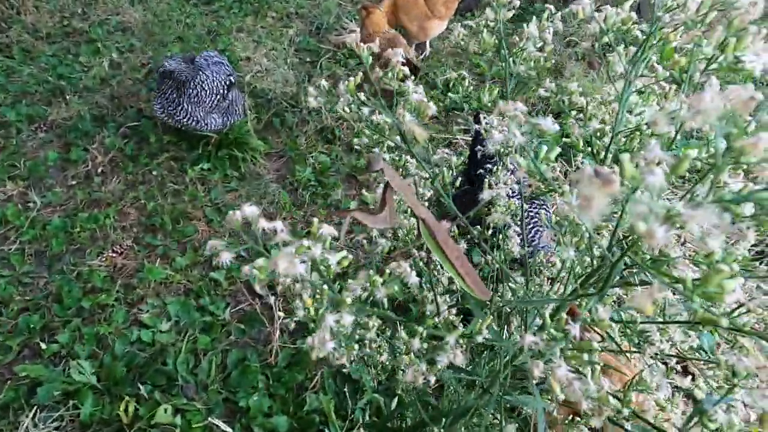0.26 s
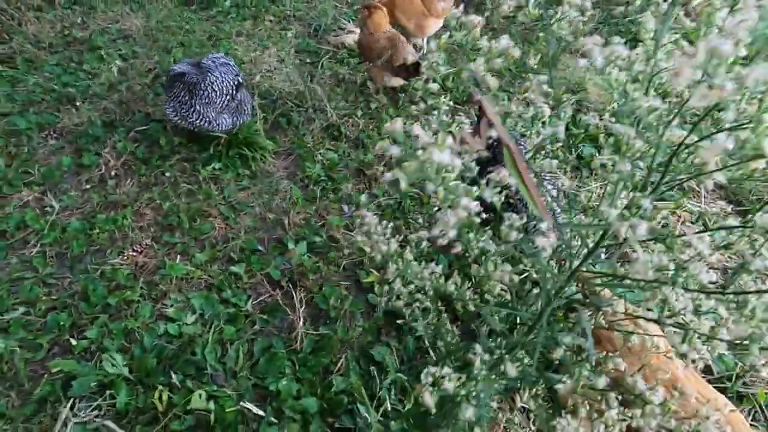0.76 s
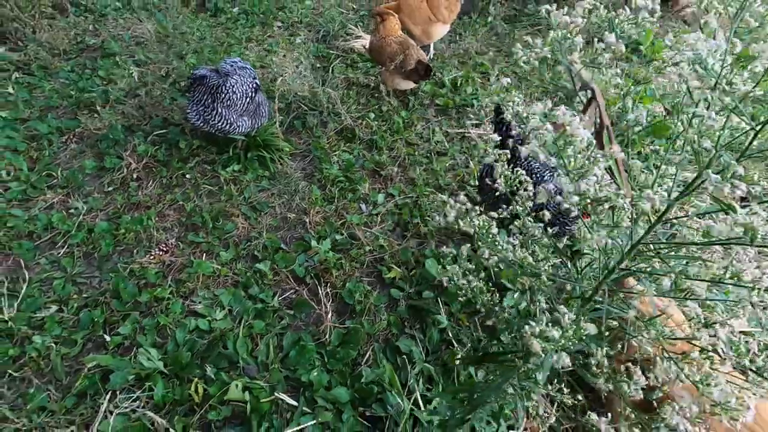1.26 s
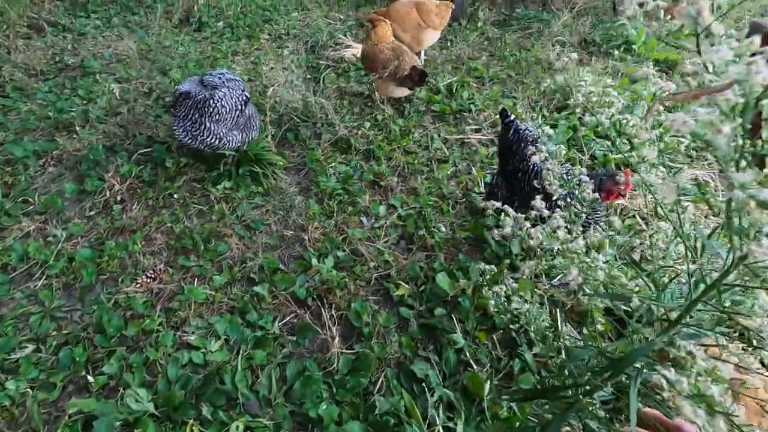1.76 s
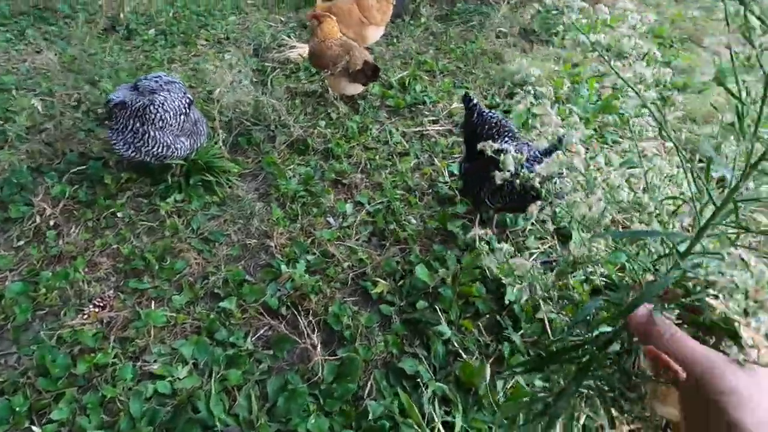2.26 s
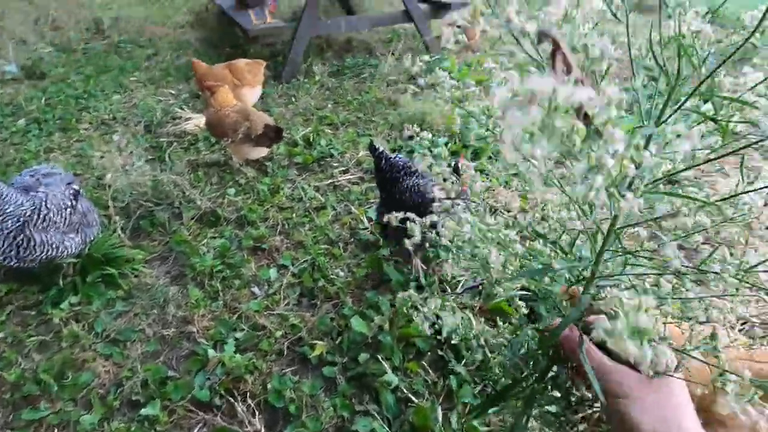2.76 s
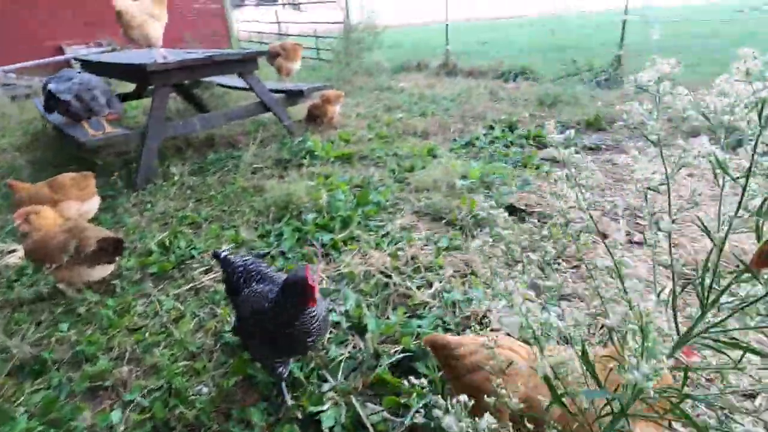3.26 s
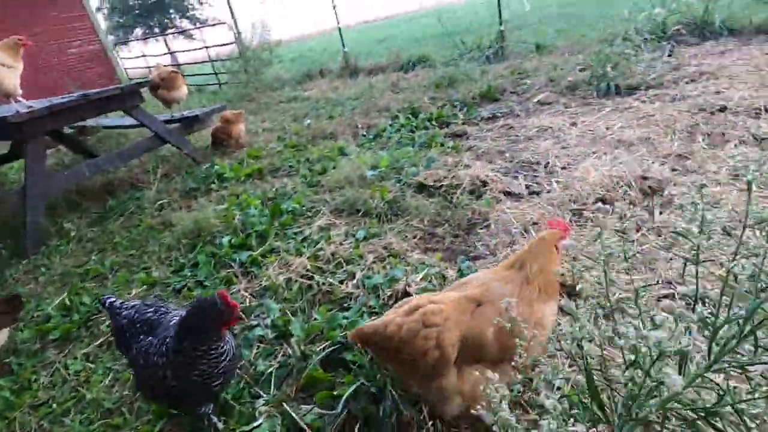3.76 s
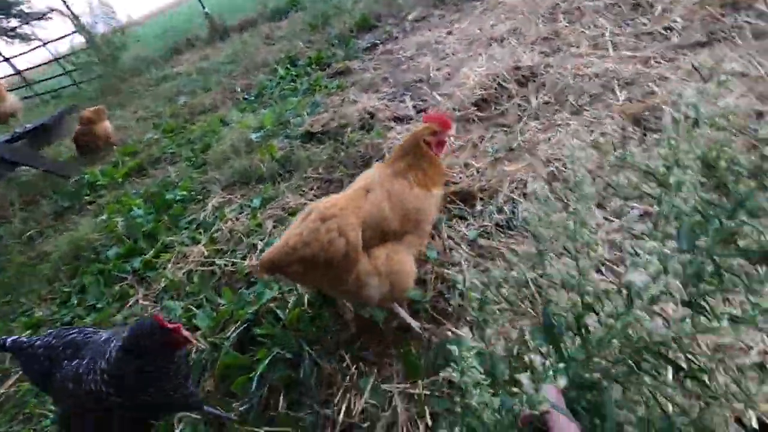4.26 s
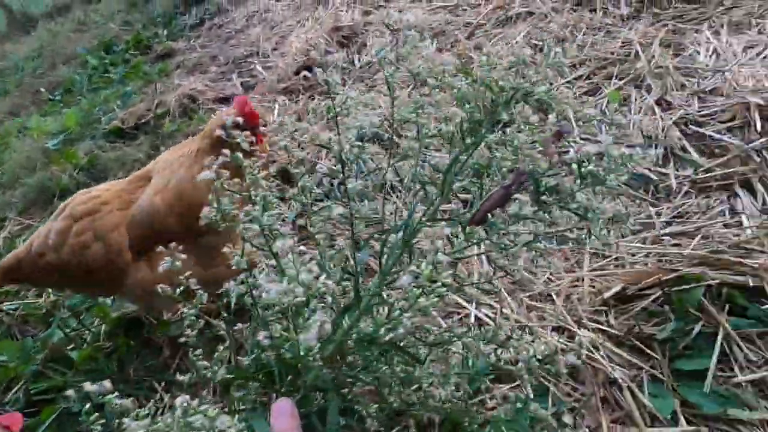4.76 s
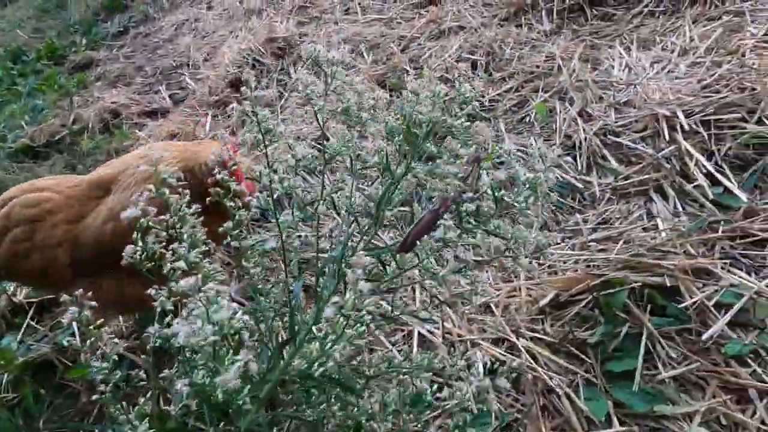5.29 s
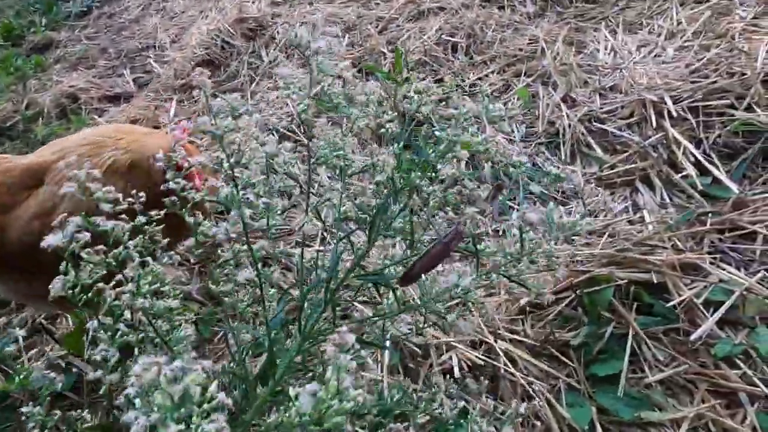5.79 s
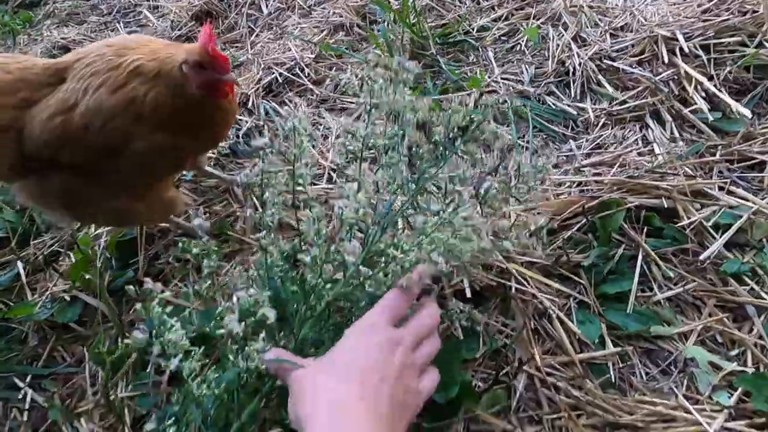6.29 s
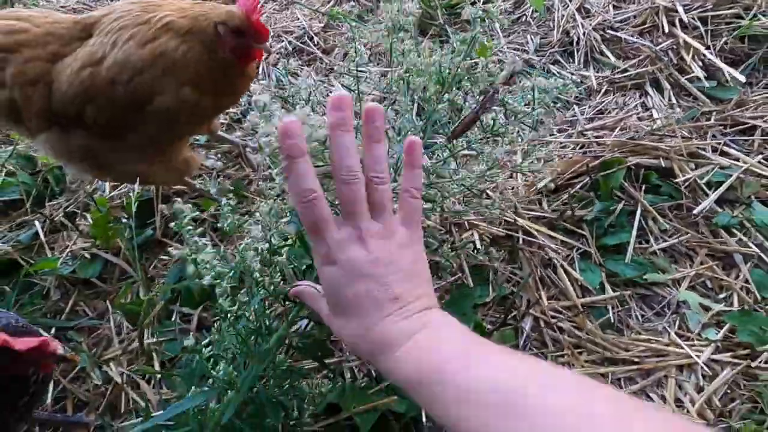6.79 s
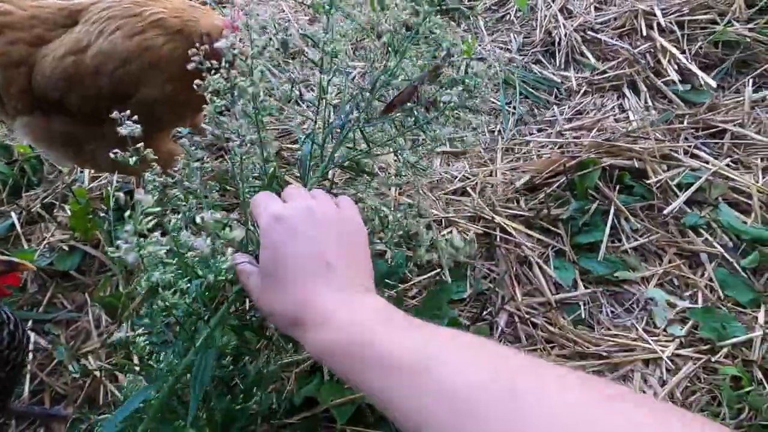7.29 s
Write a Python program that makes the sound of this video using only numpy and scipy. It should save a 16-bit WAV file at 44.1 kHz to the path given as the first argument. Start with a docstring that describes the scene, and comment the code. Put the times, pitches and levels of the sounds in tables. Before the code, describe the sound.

A nearby hen clucks and draws out hoarse, whining moans while dry weeds rustle and snap close by, over faint crickets in a quiet yard.

```python
"""A hen a step away clucks and draws out long calls: harmonic stacks in which a thin whine breaks into a
nasal moan, and alternating strong and weak cycles make it hoarse. Tall weeds close to the microphone swish
and scrape as dense tiny contacts, and stalks snap as decaying noise bursts. Soft bumps are damped sines,
puffs of air low noise. Crickets chirp in short falling tones over coloured yard noise and the unsteady
low sine of a distant engine."""
import sys
import numpy as np
from scipy import signal
from scipy.fft import rfft, irfft, next_fast_len
from scipy.io import wavfile

SR = 44100
rng = np.random.default_rng(int(sys.argv[2]) if len(sys.argv) > 2 else 0)


def bounce(signal):
    """Save signal as a 16-bit WAV file at the path given by the first command-line argument."""
    frames = np.transpose(np.atleast_2d(signal))
    limited = np.clip(frames, -1, 1)
    pcm = np.round(limited * 32767).astype(np.int16)
    wavfile.write(sys.argv[1], SR, pcm)


N = 332514
T = np.arange(N) / SR


def undb(db):
    """Level law: decibels to amplitude gain."""
    return 10 ** (np.asarray(db) / 20)


def unit(x):
    """Normalization: scale to rms 1."""
    return x / np.sqrt(np.mean(x ** 2))


def curves(rows, t=T):
    """Linear interpolation: the columns of a table, joined by straight lines in time."""
    s, *columns = np.transpose(rows)
    return [np.interp(t, s, c) for c in columns]


def colour_db(points, hz):
    """Spectral envelope: read a spectrum in dB on a log-frequency axis."""
    f, db = np.transpose(points)
    return np.interp(np.log(hz + 1), np.log(f), db)


def tint(x, points):
    """Linear filtering: multiply the spectrum of x by an envelope."""
    size = next_fast_len(N)
    gain = undb(colour_db(points, np.fft.rfftfreq(size, 1 / SR)))
    return irfft(rfft(x, size) * gain, size)[..., :N]


def band(x, lo_hz, hi_hz):
    """Resonance: a gentle first-order band-pass."""
    edges = [lo_hz, min(hi_hz, SR / 2 - 1000)]
    return signal.sosfilt(signal.butter(1, edges, "band", fs=SR, output="sos"), x)


def walk(rate, t=T):
    """Random fluctuation: independent normal levels, rate a second, joined by lines."""
    return np.interp(t * rate, np.arange(4096), rng.standard_normal(4096))


def spread(three, width):
    """Interaural coherence: a shared signal plus one of its own for each ear."""
    width = np.clip(width, 0, 1)
    return np.sqrt(1 - width) * three[0] + np.sqrt(width) * three[1:]


def pan(db):
    """Level difference between the ears: left and right gains for left minus right in dB."""
    return undb(np.array([[1], [-1]]) * db / 2)


def add(out, s, x):
    """Superposition: mix x into out from s seconds."""
    i = max(int(s * SR), 0)
    out[..., i:i + x.shape[-1]] += x[..., :max(N - i, 0)]


# Spectrum of the yard noise. Each row: frequency in Hz, relative level in dB.
YARD_COLOUR = [(25, -2), (53, -1), (118, -3.5), (224, -5), (320, -15.5), (475, -19.5), (800, -20.5),
               (1050, -20), (1500, -17), (2600, -34), (3500, -19.5), (4100, -25.5), (4750, -16.5),
               (5700, -31), (8000, -35.5), (12000, -54), (15000, -63)]
# Distant engine hum. Each row: time in seconds, relative level in dB.
HUM_LEVEL = [(0, -51.5), (1.2, -57.5), (1.9, -57), (3.3, -68.5), (4.7, -63), (7.54, -65.5)]


def yard(yard_db=-56, hum_hz=108):
    """Ambient noise: far-off rumble and a diffuse haze of insects, with a frequency-wandering engine hum."""
    noise = unit(tint(rng.standard_normal((3, N)), YARD_COLOUR))
    low = signal.sosfilt(signal.butter(1, 1500, fs=SR, output="sos"), noise)
    rumble = spread(low, 0.35) * undb(1.57 * walk(7.6))
    haze = spread(noise - low, 0.9) * undb(0.38 * walk(1.6))
    hum = np.sqrt(2) * np.sin(2 * np.pi * np.cumsum(hum_hz + 4.29 * walk(16)) / SR)
    hum_db = curves(HUM_LEVEL)[0] - 1.0 + 4.05 * walk(15)
    return undb(yard_db) * (rumble + haze) + hum * undb(hum_db)


# Cricket chirps. Each row: start in seconds, peak level in dB before panning, number of wing strokes.
CHIRP_ROWS = [(.17, -55.5, 3), (0.896, -54.5, 3), (1.48, -51.5, 3), (2.12, -54, 3), (2.762, -56, 3),
              (3.354, -56.5, 4), (3.969, -58.5, 3), (4.69, -62, 3), (5.513, -59.5, 3), (6.098, -62, 4),
              (6.91, -60.5, 3), (7.484, -63, 1)]
# A second cricket's trill. Each row: time in seconds, mean peak level in dB before panning.
TRILL_LEVEL = [(2.2, -86), (2.27, -65), (2.37, -74), (2.55, -59.5), (2.7, -63.5), (2.8, -92)]


def crickets(stroke_s=0.036, period_s=.053, start_hz=4720, end_hz=4400, trill_hz=4335):
    """Stridulation: each wing stroke is a short falling tone; a second cricket holds one brief trill."""
    out, t = np.zeros(N), np.arange(0, stroke_s, 1 / SR)
    for s, db, strokes in CHIRP_ROWS:
        for k in range(int(round(strokes))):
            hz = np.linspace(start_hz, end_hz, len(t)) * (1 + 0.015 * walk(400, t))
            stroke = np.hanning(len(t)) * np.sin(2 * np.pi * np.cumsum(hz) / SR)
            add(out, s + k * period_s, undb(db) * stroke)
    trill = np.sin(2 * np.pi * np.cumsum(trill_hz + 20 * walk(150)) / SR)
    trill = trill * undb(curves(TRILL_LEVEL)[0] + 1.5 * walk(60))
    return (out + trill) * pan(3.4)


# Soft bumps and taps near the microphone.
# Each row: start in seconds, relative level in dB, frequency in Hz, 60 dB decay time in seconds.
BUMP_ROWS = [(.336, -46.5, 328, 0.028), (.366, -38.5, 260, 0.033), (0.4, -34, 110, 0.027),
             (.436, -35.5, 285, 0.02), (.494, -31, 76, 0.093), (.497, -37, 235, 0.028),
             (1.282, -35, 935, 0.014), (1.491, -23.5, 1200, 0.012), (4.44, -30, 40, 0.045),
             (7.455, -35.5, 170, 0.019)]
# Spectrum of air on the microphone. Each row: frequency in Hz, relative level in dB.
AIR_SPECTRUM = [(15, -2.5), (28, 2.5), (65, 8), (100, -1.5), (200, -19), (400, -27), (900, -67.5)]
# Puffs of air. Each row: centre in seconds, full width to 1/e in seconds, level in dB.
PUFF_ROWS = [(0.51, 0.08, -42.5), (.8, .9, -53), (1.78, 0.1, -52), (3.06, 0.3, -55), (3.648, 0.37, -51.5),
             (4.464, 0.077, -46)]
DRAUGHT_DB = -62.5  # mean level of the air between the puffs


def handling():
    """Damped oscillation and turbulence: decaying knocks, and low puffs of air over a faint draught."""
    knocks, t = np.zeros(N), T[:SR // 5]
    for s, db, hz, t60 in BUMP_ROWS:
        onset = 1 - np.exp(-t / 0.0011)
        add(knocks, s, -undb(db + 3.0 - 60 * t / t60) * np.sin(2 * np.pi * hz * t) * onset)
    air = spread(unit(tint(rng.standard_normal((3, N)), AIR_SPECTRUM)), 0.47)
    puffs = sum(undb(db) * np.exp(-(2 * (T - s) / length) ** 2) for s, length, db in PUFF_ROWS)
    return knocks + air * np.hypot(puffs, undb(DRAUGHT_DB + 5.0 * walk(9.7)))


# Dry stalks snapping.
# Each row: start in seconds, relative peak level in dB, left minus right in dB, ring frequency in Hz.
SNAP_ROWS = [(.4983, -38.5, 11, 4000), (1.0992, -42, 8, 2320), (1.143, -54, 2, 2600),
             (1.4823, -38, 0, 4520), (1.658, -41, -2, 3300), (1.6732, -37.5, 3, 2870),
             (1.749, -42.5, 8, 2590), (1.7796, -31, 5, 2910), (1.7953, -39, 4, 2540),
             (2.0313, -45, 5, 2510), (2.076, -40, 2, 2570), (2.7088, -38.5, .5, 2940),
             (2.8565, -37, 0, 2560), (2.897, -42, 5, 1590), (3.2904, -36.5, 9, 3170),
             (4.1522, -39, 1, 4600), (4.3, -36.5, -5, 2625), (4.356, -53, 0, 2380), (4.5134, -39, 6, 3620),
             (4.678, -41, -1, 4950), (4.7728, -40, 4, 3120), (4.8302, -42, 4, 4770),
             (5.0928, -38, -1, 3210), (5.151, -38, 6, 3710), (5.1622, -28, -1, 3200),
             (5.23, -41.5, 1.5, 2450), (5.3424, -43.5, 12, 2850), (5.436, -44, 0, 6500),
             (5.6927, -48.5, 12, 4730), (6.834, -45, 0, 4540), (7.2869, -49, 7, 2930)]
SNAP_T60_S = .012  # decay of the splintering


def snaps(first_db=12, first_t60=0.0053, after_db=-20, after_t60=0.052):
    """Brittle fracture: a sharp crack, a few milliseconds of splintering and a faint shiver."""
    out, t = np.zeros((2, N)), T[:SR // 20]
    for s, db, pan_db, hz in SNAP_ROWS:
        fading = undb(first_db - 60 * t / first_t60)
        fading += undb(-60 * t / SNAP_T60_S)
        fading += undb(after_db - 60 * t / after_t60)
        crack = band(spread(rng.standard_normal((3, len(t))), 0.26) * fading, hz / 2, hz * np.sqrt(2))
        add(out, s, crack / np.abs(crack).max() * undb(db + 1.5) * pan(pan_db))
    return signal.sosfilt(signal.butter(2, 11000, fs=SR, output="sos"), out)


def crackle(colour, rate, size_db, width):
    """Shot noise: random tiny contacts, rate a second, of very uneven size."""
    hits = rng.random((3, N)) < rate / SR
    sizes = undb(size_db * np.minimum(rng.exponential(size=(3, N)), 5)) * rng.standard_normal((3, N))
    return spread(unit(tint(hits * sizes, colour)), width)


STEM_WIDTH = 2.25  # the stems' band reaches this factor to either side of their ring


def scrape(stems, ring_hz):
    """Structural resonance: stem contacts filtered twice around the stems' ring, at rms 1."""
    for _ in range(2):
        stems = band(stems, ring_hz / STEM_WIDTH, ring_hz * STEM_WIDTH)
    return unit(stems)


# Spectra of leaf contacts and stem contacts. Each row: frequency in Hz, relative level in dB.
LEAF_SPECTRUM = [(700, -21.5), (1500, -14.5), (3000, 0.5), (5000, 2.5), (7000, -1.5), (8500, -5),
                 (10000, -10.5), (12500, -16), (15000, -25)]
STEM_SPECTRUM = [(200, -3.5), (450, 5), (800, 1), (1300, 3.5), (1750, 1.5), (2600, -1), (3400, -1),
                 (4600, -5.5), (7000, -39)]
# Brushes through the weeds. Each row: start in seconds, length in seconds, relative swish level in dB,
# stems against swish in dB, stem ring in Hz.
BRUSH_ROWS = [(0.196, 0.07, -70.5, 2, 3000), (0.346, .16, -71, 8, 1180), (0.487, .015, -70.5, 11.5, 2000),
              (0.529, 0.14, -89, 19.5, 3400), (1.08, 0.081, -71, 10, 2400), (1.269, 0.3, -60.5, 4, 1410),
              (1.466, 0.032, -63.5, 7.5, 1300), (1.555, 0.16, -65.5, 8.5, 1870),
              (1.749, 0.06, -62.5, 11, 2100), (1.877, 0.2, -63.5, 6, 1770), (2.013, 0.15, -54.5, 3, 1600),
              (2.252, .06, -66, 1.5, 2010), (2.709, .035, -62, 11, 2960), (2.752, 0.038, -63.5, 5.5, 3100),
              (2.781, 0.095, -61, 5, 2400), (3.036, 0.1, -62, -1, 1730), (3.148, 0.077, -58, 2, 3000),
              (3.266, .04, -70.5, 13, 2480), (3.755, 0.083, -65.5, -8, 2400), (4.155, .11, -67, -1, 2000),
              (4.253, 0.096, -59.5, -3.5, 2400), (4.399, 0.097, -65, -3, 2570),
              (4.482, 0.087, -61.5, 0.5, 2520), (4.673, 0.021, -53.5, -13, 2986),
              (4.756, 0.082, -57, -4, 2410), (4.871, .12, -67.5, 4, 1570), (5.094, 0.092, -59, 0.5, 1960),
              (5.203, 0.066, -68, 7.5, 1760), (5.305, 0.098, -63.5, -17, 2500),
              (5.676, .16, -69, -21, 2500), (5.91, 0.37, -65.5, -23, 2500),
              (6.181, 0.071, -56.5, -0.5, 2430), (6.3, 0.18, -71, 4.5, 2700), (6.713, 0.095, -74, -2, 2500),
              (7.244, 0.043, -74.5, 12, 1500)]
BRUSH_RISE, BRUSH_T60_S = .45, 0.33  # build-up as share of the length, 60 dB decay time
TICK_DB = -4.5  # separate dry ticks against the stems' scrape
# the weeds never quite come to rest: relative levels of leaves and stems, wander, left minus right
STIR_DB, STIR_STEM_DB, STIR_WANDER_DB, STIR_PAN_DB = -75.5, -74.5, 1, 1
STIR_RING_HZ = 2160


def weeds():
    """Frictional contact: leaves swish high and stems scrape and tick as each brush builds, holds and dies."""
    leaves = crackle(LEAF_SPECTRUM, rate=6000, size_db=3.0, width=0.73)
    stems = crackle(STEM_SPECTRUM, rate=3000, size_db=3.0, width=0.37)
    stems += undb(TICK_DB) * crackle(STEM_SPECTRUM, rate=70, size_db=3.2, width=0.1)
    leaf_power, scrapes = np.zeros(N), np.zeros((2, N))
    for s, length, db, stem_db, hz in BRUSH_ROWS:
        rise = BRUSH_RISE * length
        t = np.arange(-rise / 2, length + BRUSH_T60_S, 1 / SR)
        decay_db = -60 * np.maximum(t - length, 0) / BRUSH_T60_S
        brush = np.minimum(t / rise + .5, 1) * undb(db + decay_db)
        first = rng.integers(N // 2)  # a random stretch of stem contacts
        add(leaf_power, s + t[0], brush ** 2)
        add(scrapes, s + t[0], brush * undb(stem_db) * scrape(stems[:, first:first + len(t)], hz))
    stir = undb(STIR_WANDER_DB * walk(4.9)) * pan(STIR_PAN_DB)
    swish = leaves * np.hypot(np.sqrt(leaf_power), undb(STIR_DB) * stir)
    scrapes = scrapes + undb(STIR_STEM_DB) * stir * scrape(stems, STIR_RING_HZ)
    spurts = undb(3.0 + 2.0 * walk(70))  # quick uneven spurts
    return (swish + scrapes) * spurts


# Where the voice cracks into irregular cycles.
# Each row: centre in seconds, full width to 1/e in seconds, depth from 0 to 1.
CRACK_ROWS = [(0.13, 0.053, 0.23), (1.384, .12, 0.38), (2.193, 0.028, 0.71), (2.402, 0.032, 0.85),
              (2.451, 0.0081, 0.8), (6.18, 0.023, 0.13), (7.237, 0.013, 0.3)]
# Throat gain for the high overtones, and for the lines between harmonics.
# Each row: frequency in Hz, relative gain against the second harmonic in dB.
THROAT_GAIN = [(1800, -22.5), (2200, -27), (2700, -42.5), (3250, -33), (3800, -46.5), (4600, -54.5),
               (6500, -57.5)]
HOARSE_GAIN = [(270, -8), (800, -10.5), (1350, 2.5), (1900, -11), (2450, -22), (3000, -26), (4500, -49)]
WAVER_PER_S = 36  # turns of a wavering whine


def syrinx(rows, overtone_db, waver, jitter=.007, wobble=0.0081, shimmer_db=1.42, rasp_db=-30):
    """Period doubling: in a harmonic stack, alternating strong and weak cycles put lines between harmonics."""
    t = np.arange(rows[0][0], rows[-1][0], 1 / SR)
    hz, first_db, second_db, third_db, doubling = curves(rows, t)
    crack = sum(depth * np.exp(-(2 * (t - s) / length) ** 2) for s, length, depth in CRACK_ROWS)
    hz = hz * (1 + (jitter + 0.0572 * crack) * walk(190, t) + wobble * walk(60, t))
    # without pressure behind it the pitch wavers
    whining = np.clip((first_db - second_db) / 20, 0, 1)
    phase = 2 * np.pi * np.cumsum(hz * (1 + waver * whining * walk(WAVER_PER_S, t))) / SR

    # the second harmonic sits on the main throat resonance; an open beak lifts the lines above it
    opening_db = np.clip(third_db + 23, -15, 15)
    levels = [first_db, second_db, second_db + third_db]
    high_db = second_db + overtone_db + .4 * np.maximum(opening_db, 0)
    levels += [high_db + colour_db(THROAT_GAIN, k * hz) for k in np.arange(4, 12)]

    hoarse = doubling * undb(second_db + 2 * walk(50, t))
    voice = 0
    for k, db in enumerate(levels, 1):
        shimmer = shimmer_db * max(k / 4, 1) * walk(130, t)
        voice += undb(db + shimmer) * np.cos(k * phase)
        # a closing beak lowers the resonance toward the in-between line just under it
        closed_db = -.7 * np.minimum(opening_db, 0) * (k == 2)
        between_gain = undb(colour_db(HOARSE_GAIN, (k - .5) * hz) + closed_db)
        voice += hoarse * between_gain * np.sin((k - .5) * phase)

    breath = band(band(rng.standard_normal(len(t)), 770, 1200), 770, 1200)
    rasp = unit(breath) * (1 + np.cos(phase))  # pulses with each cycle
    fade = np.clip(np.minimum(t - t[0], t[-1] - t) / 0.0014, 0, 1)
    return fade * (1 + crack * walk(450, t)) * (np.sqrt(2) * voice + undb(second_db + rasp_db) * rasp)


def cluck(s, length, lead_hz, hz, first_db, second_db, third_db):
    """Register break: a faint high lead-in drops to a short low note, which rises a little as it dies."""
    # each row: time in seconds, pitch in Hz, fundamental dB, second dB, third against second dB, doubling
    return [(s - .024, lead_hz, first_db - 16, second_db - 53, third_db, 0),
            (s - .005, lead_hz * .95, first_db - 6, second_db - 39, third_db, 0),
            (s + 0.00387, hz * 1.04, first_db - 4, second_db, third_db, 0),
            (s + 0.28 * length, hz, first_db, second_db, third_db, 0),
            (s + .65 * length, hz * (1 + 1.3 * length), first_db + 0.5, second_db + 0.5, third_db - 2.5, 0),
            (s + length, hz * 1.1, first_db - 7.5, second_db - 6, third_db - 28, 0),
            (s + length + 0.0048, hz * 0.99, first_db - 15, second_db - 31, third_db - 19, 0)]


WHINE_ATTACK_S, WHINE_ONSET_DB, WHINE_DROOP = .008, 1, 0.0248  # droop as share of pitch
WHINE_SECOND_DB, WHINE_THIRD_DB = -27, -30  # a whine is almost a pure tone
SWELL_TIME, SWELL_SHARE = 0.356, 0.67  # this early part of the whine brings this share of its swell
SAG_SHARE = .19  # last part of the whine, in which it sags
# the whine sags and brightens, then drops into the moan
BREAK_S, BREAK_SAG, BREAK_DIP_DB, BREAK_SECOND_DB = .02, 0.0502, -4.5, -7.5
BREAK_RATIO = 1.37  # the whine sinks at least to this multiple of the moan's pitch before it breaks
MOAN_REF_DB, FUNDAMENTAL_SLOPE = -42.5, 0.35  # dB of fundamental per dB of moan above the reference
RELEASE_RISE_PER_S, RELEASE_FUNDAMENTAL_DB, RELEASE_SECOND_DB = 5.0, -10, -32  # pitch lifts as a call stops


def call(start, whine_hz, whine_db, swell_db, fundamental_db, release_s, moan):
    """Vocal effort: a thin whine breaks into a moan, where effort goes mostly into the second harmonic."""
    holds = start + WHINE_ATTACK_S
    length = max(moan[0][0] - BREAK_S - holds, 1 / SR)
    break_ratio = min(1 - BREAK_SAG, BREAK_RATIO * moan[0][1] / whine_hz)
    # each row: time in seconds, pitch against the whine's, swell in dB, second against fundamental in dB
    shape = [(start, 1 + WHINE_DROOP, WHINE_ONSET_DB, WHINE_SECOND_DB),
             (holds, 1, 0, WHINE_SECOND_DB),
             (holds + SWELL_TIME * length, 1, SWELL_SHARE * swell_db, WHINE_SECOND_DB),
             (holds + (1 - SAG_SHARE) * length, 1 - WHINE_DROOP / 2, swell_db, WHINE_SECOND_DB),
             (holds + length, break_ratio, swell_db + BREAK_DIP_DB, BREAK_SECOND_DB)]
    whine = [(s, whine_hz * ratio, whine_db + db, whine_db + db + second_db, WHINE_THIRD_DB, 0)
             for s, ratio, db, second_db in shape]
    held = [(s, hz, fundamental_db + FUNDAMENTAL_SLOPE * (db - MOAN_REF_DB), db, beak_db, doubling)
            for s, hz, db, beak_db, doubling in moan]
    s, hz, first_db, second_db, beak_db, doubling = held[-1]
    release = (s + release_s, hz * (1 + RELEASE_RISE_PER_S * release_s),
               first_db + RELEASE_FUNDAMENTAL_DB, second_db + RELEASE_SECOND_DB, beak_db, doubling)
    return whine + held + [release]


# The moan that ends each call. Each row: time in seconds, pitch in Hz, second harmonic level in dB,
# beak opening as third against second harmonic in dB, period doubling from 0 to 1.
SHORT_MOAN = [(.088, 553, -45.5, -19, 0.07), (0.142, 545, -47.5, -13, 0)]
WAVERING_MOAN = [(1.551, 543.5, -47.5, -38, 0.14), (1.745, 587, -55.5, -5, 0.13),
                 (1.809, 529.8, -37.5, -34, 0), (1.89, 531.3, -45, -42, 0.15),
                 (1.948, 579.5, -57, -10, 0.15), (2.111, 514.4, -36, -20, .06),
                 (2.191, 520, -42.5, -54.5, .2), (2.24, 581, -53, -13, .03), (2.29, 526, -45.5, -24, 0.061),
                 (2.362, 518.5, -36, -36, 0.013), (2.384, 504, -54, -20, 0), (2.434, 461, -39.5, -13, 0.05)]
PARTING_MOAN = [(2.549, 535, -57.5, -22, 0.0084), (2.586, 482, -48.5, -18, 0), (2.6, 556, -57, -22, 0)]
SWELLING_MOAN = [(4.109, 521.6, -36, -35, 0.056), (4.17, 549, -45.5, -23, .05),
                 (4.266, 533, -41, -31, 0.034), (4.29, 564, -48.5, -24, 0), (4.432, 533.7, -36, -32, .025),
                 (4.51, 541, -35, -18, 0), (4.531, 550, -34, -37, 0.21), (4.62, 523, -31, -48, 0.15),
                 (4.643, 537, -38, -39, 0.2)]
LOUD_MOAN = [(6.168, 523, -36, -20, 0.042), (6.221, 526.7, -32.5, -26, 0),
             (6.269, 546.3, -39.5, -14.5, 0.012), (6.3, 537, -33, -17, .1), (6.38, 531.6, -31.5, -31, 0.14),
             (6.44, 539.4, -37, -21, 0.065), (6.497, 551, -36, -23, 0.11), (6.511, 583, -43, -12, 0.22),
             (6.526, 545, -35.5, -26, .02), (6.575, 547, -31, -18.5, 0.071), (6.676, 571, -37, -19, 0.33)]
NASAL_MOAN = [(6.917, 557, -46, -15, 0.09), (6.97, 554, -44, -7.5, .08), (7.04, 567, -43.5, -11, 0.57),
              (7.057, 627, -40.5, -22, .35), (7.09, 549, -39, -12.5, 0.17), (7.197, 541, -35, -13.5, 0.084),
              (7.238, 542, -39, -17, 0.38)]
# Calls. Each row: start in seconds, whine pitch in Hz, whine level in dB, whine swell in dB,
# moan fundamental at the reference moan level in dB, release in seconds,
# whine waver as share of pitch, high overtones in dB, moan.
CALLS = [(0, 730, -50, -0.5, -54.5, 0.034, 0.017, -3, SHORT_MOAN),
         (1.19, 709, -60, 7, -50.5, .018, 0.023, -11, WAVERING_MOAN),
         (2.45, 577, -50.5, -1.5, -43.5, 0.019, 0.042, 0, PARTING_MOAN),
         (3.73, 717, -56, 12.5, -47.5, .012, .018, 1.5, SWELLING_MOAN),
         (5.875, 877.6, -43.5, -2, -47, 0.027, .005, -7, LOUD_MOAN),
         (6.89, 739, -67.5, 21.5, -46, .012, 0.0045, 2.5, NASAL_MOAN)]
# Clucks. Each row: start of the low note in seconds, length in seconds, lead-in pitch in Hz, pitch in Hz,
# fundamental level in dB, second harmonic level in dB, third against second harmonic in dB.
CLUCK_ROWS = [(1.076, 0.081, 842, 485.4, -59, -41.5, -39), (3.685, 0.04, 829, 448.4, -47.5, -34.5, -13.5),
              (5.84, 0.03, 937, 467, -44, -32.5, -10.5), (6.856, 0.021, 720, 514, -48, -44.5, -1.5),
              (7.48, 0.025, 662, 506, -50, -38, -9.5)]
# Direction of the hen. Each row: time in seconds, left minus right in dB.
HEN_DIRECTION = [(0, 1), (1.1, 1.5), (1.9, 1.5), (2.3, 0.5), (3.7, 0), (4.5, -2), (6.5, -2.3), (7.1, -3)]
PORT_LAG_S = .00006  # her voice reaches the left port this much later


def hen(echo_db=-24.5, echo_t60=0.29, cluck_overtone_db=-4):
    """Direct and reverberant sound: her voice reaches the left port late, with a faint echo from the yard."""
    voice = np.zeros(N)
    # the high overtones beam forward, so their level differs from call to call as her head turns
    for *row, waver, overtone_db, moan in CALLS:
        add(voice, row[0], syrinx(call(*row, moan), overtone_db, waver))
    for row in CLUCK_ROWS:
        note = cluck(*row)
        add(voice, note[0][0], syrinx(note, cluck_overtone_db, 0))
    late = np.interp(T - PORT_LAG_S, T, voice)
    direct = np.array([late, voice]) * pan(curves(HEN_DIRECTION)[0])
    t = T[:SR // 2]
    tail = rng.standard_normal((2, len(t))) * undb(-60 * t / echo_t60) * (t > .012)
    tail /= np.sqrt(np.sum(tail ** 2) / 2)
    return direct + undb(echo_db) * signal.fftconvolve(voice[None], tail)[:, :N]


def scene():
    """Superposition: everything in the yard, from the background to the hen."""
    return yard() + crickets() + handling() + snaps() + weeds() + hen()


# Balance of the microphone ports. Each row: frequency in Hz, left minus right in dB.
PORT_BALANCE = [(200, 0.5), (1200, 0.5), (2500, 4.5), (5000, 3), (9000, -2.5)]
TOP_HZ = 15300


def record(dry):
    """Transducer response: the two ports colour the sound a little differently; the top is cut."""
    ports = [tint(x, [(hz, side * db / 2) for hz, db in PORT_BALANCE]) for x, side in zip(dry, (1, -1))]
    return signal.sosfilt(signal.ellip(8, .2, 70, TOP_HZ, fs=SR, output="sos"), np.array(ports))


dry = scene()
out = record(dry)
bounce(out)
```